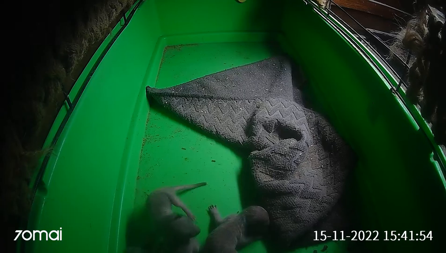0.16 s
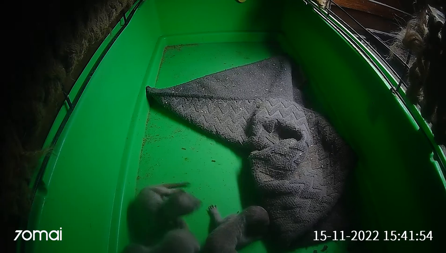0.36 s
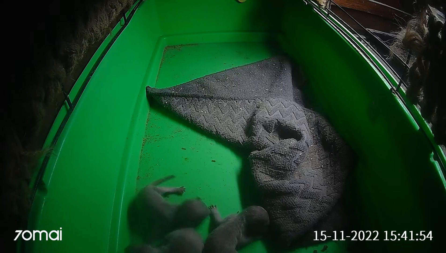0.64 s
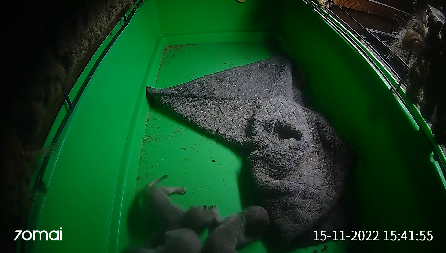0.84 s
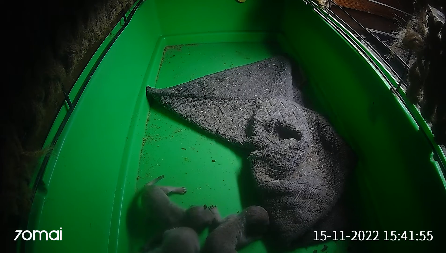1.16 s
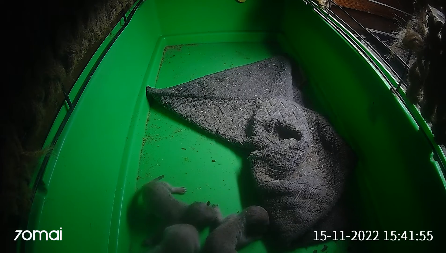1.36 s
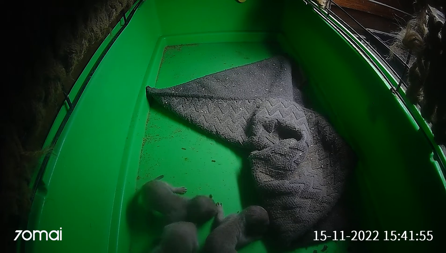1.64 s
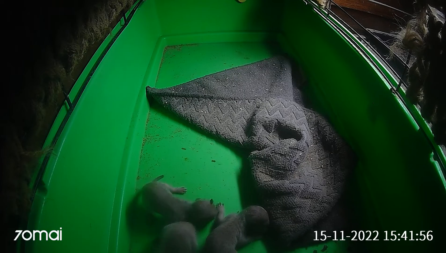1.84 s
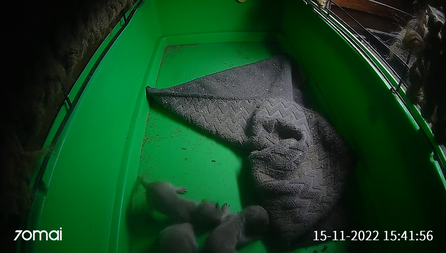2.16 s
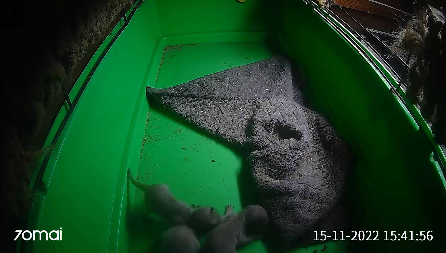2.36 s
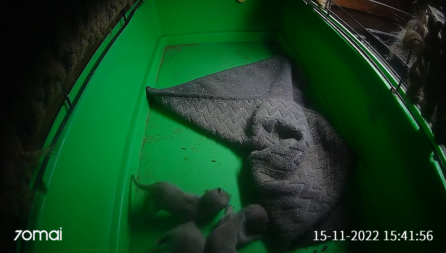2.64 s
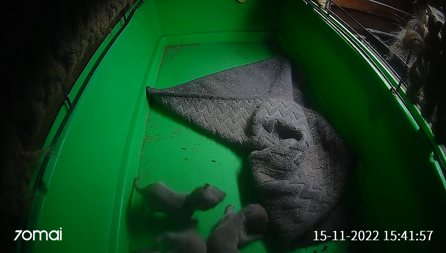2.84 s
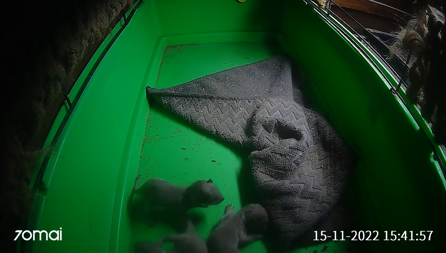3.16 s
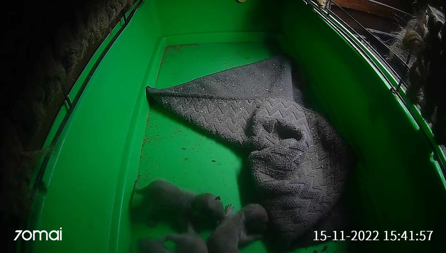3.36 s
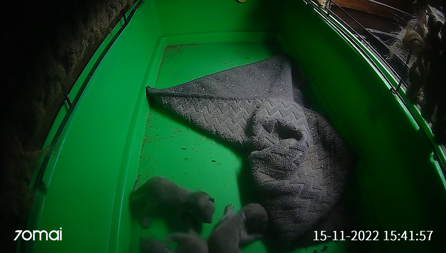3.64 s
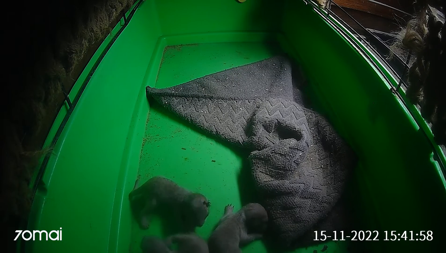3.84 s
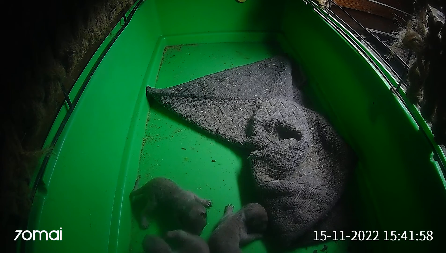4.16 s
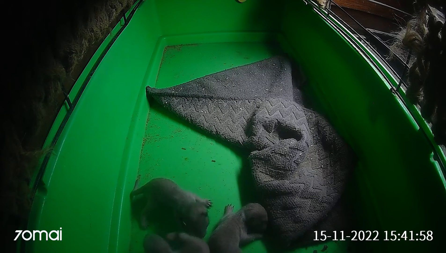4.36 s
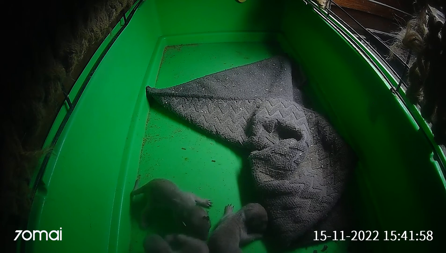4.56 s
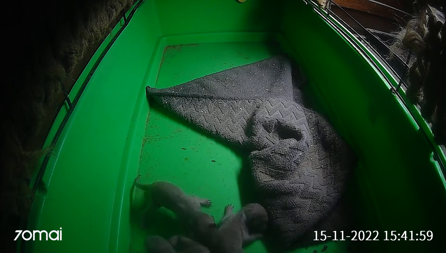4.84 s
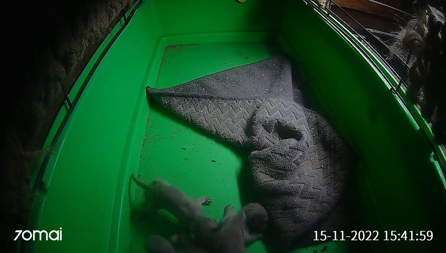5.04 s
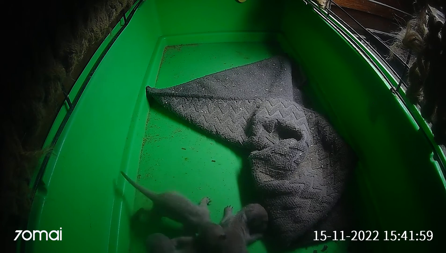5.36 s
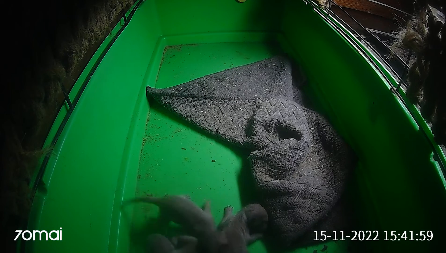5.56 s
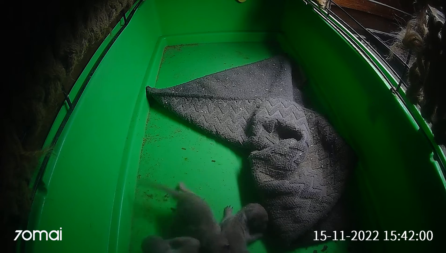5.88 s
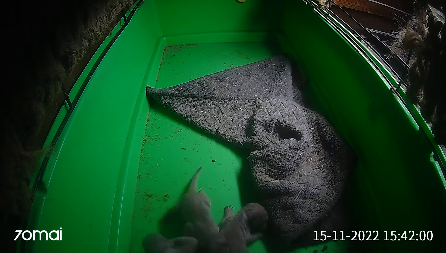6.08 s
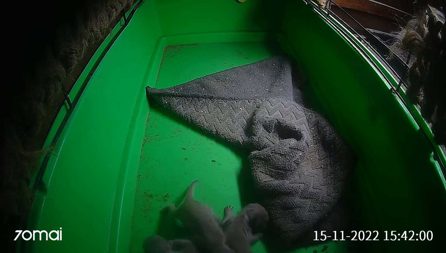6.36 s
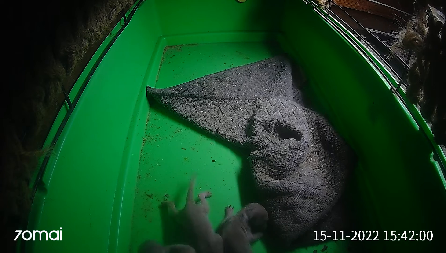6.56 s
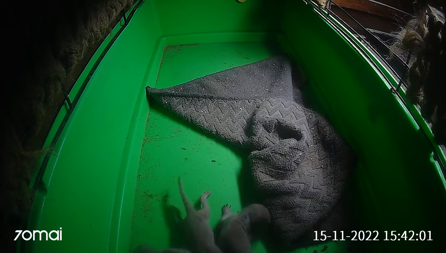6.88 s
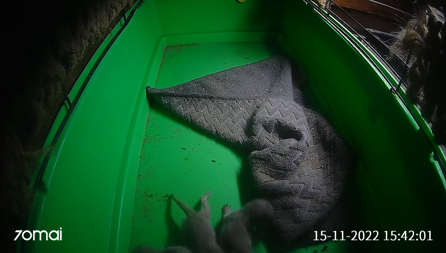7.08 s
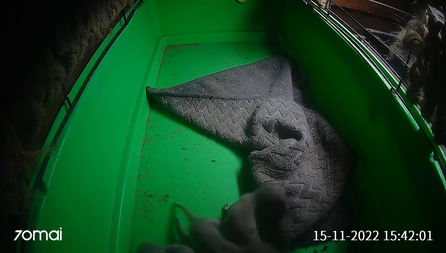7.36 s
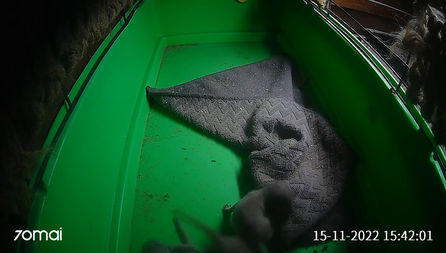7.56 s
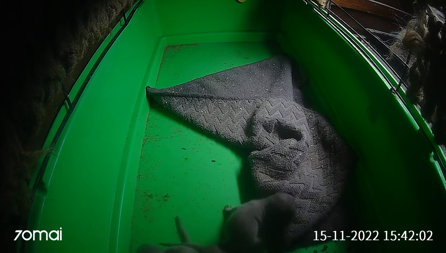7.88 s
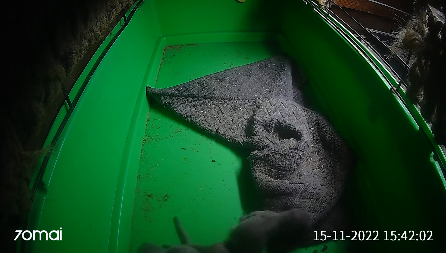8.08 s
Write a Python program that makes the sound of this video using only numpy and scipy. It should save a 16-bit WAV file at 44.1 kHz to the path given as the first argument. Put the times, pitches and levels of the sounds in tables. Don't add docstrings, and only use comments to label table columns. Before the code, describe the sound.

Several newborn pups give short, throaty peeps and quivering trills, separated by brief quiet gaps, in a hard plastic tub. Claws tick and scratch the floor; cloth rustles faintly. A soft low hoot comes midway, then a purring murmur after six seconds, and a cluster of dull thuds near seven and a half. The small close microphone sounds narrow and slightly hissy.

```python
import sys
import numpy as np
from scipy import signal
from scipy.fft import rfft, irfft, next_fast_len
from scipy.io import wavfile
from scipy.ndimage import uniform_filter1d

SR = 44100
rng = np.random.default_rng(int(sys.argv[2]) if len(sys.argv) > 2 else 0)


def level_to_linear(level):
    exponent = np.asarray(level, float) / 20
    return 10 ** exponent


def persist_wave(psi):
    counts = np.round(np.clip(psi, -1, 1) * 32767).astype(np.int16)
    wavfile.write(sys.argv[1], SR, np.atleast_2d(counts).T)


N = 362502
TIME = np.arange(N) / SR
JOIN_S = .009
CLEAR_ROUGH = .044


def rms_one(x):
    return x / np.sqrt(np.mean(x ** 2) + 1e-20)


def passed(x, kind, hz, order=2):
    return signal.sosfilt(signal.butter(order, hz, kind, fs=SR, output="sos"), x)


def noise_below(hz):
    return rms_one(passed(rng.standard_normal(N), "low", hz))


def coloured(x, spectrum):
    hz, level_db = np.transpose(spectrum)
    size = next_fast_len(N)
    grid = np.maximum(np.arange(size // 2 + 1) * SR / size, 1)
    gain = level_to_linear(np.interp(np.log(grid), np.log(hz), level_db))
    return rms_one(irfft(rfft(x, size) * gain, size)[:N])


def ring(hz, t60):
    t = TIME[:SR // 3]
    return np.sin(2 * np.pi * hz * t) * level_to_linear(-60 * t / max(t60, .002))


def grains(per_second, spread_db, largest):
    sizes = level_to_linear(spread_db * np.minimum(rng.exponential(1, N), largest)) * rng.choice([-1, 1], N)
    return sizes * (rng.random(N) < per_second / SR)


def add(out, s, sound):
    i = round(s * SR)
    out[i:i + len(sound)] += sound[:N - i]


def voice(pitch, partials_db, jitter, shimmer, slack_db=0, resonant=0):
    # f/Hz, level/dB
    throat = [(1500, 27.5), (3000, -7.5), (4500, -6.5), (6000, -16.5), (9000, -23.5)]
    phase = 2 * np.pi * np.cumsum(pitch * (1 + jitter)) / SR
    upper_hz = np.mean(pitch) * np.arange(len(partials_db), 14)
    throat_db = np.interp(upper_hz, *np.transpose(throat))
    upper_db = partials_db[-1] - 4.5 + throat_db[1:] - throat_db[0]
    shape_db = np.concatenate([[partials_db[0] - 11.5], partials_db, upper_db])
    slide = (pitch / np.percentile(pitch, 75)) ** resonant
    tone = 0
    for k in range(1, len(shape_db)):
        partial_db = np.interp(k * slide, np.arange(len(shape_db)), shape_db)
        effort_db = slack_db * min(k - 1, 3)
        tone = tone + level_to_linear(partial_db + effort_db) * np.sin(k * phase)
    return tone * (1 + shimmer) * np.sqrt(2 / np.sum(level_to_linear(shape_db[1:]) ** 2))


def microphone_hiss():
    # f/Hz, level/dB per Hz
    hiss_colour = [(12, -50.5), (20, 9.5), (56, 1), (428, -15.5), (626, -13), (729, -24.5), (1440, -23.5),
                   (5390, -28), (7120, -30), (8500, -49), (11000, -92), (18700, -120)]
    return level_to_linear(-57) * coloured(rng.standard_normal(N), hiss_colour)


def creaks():
    return level_to_linear(-67.0) * rms_one(passed(grains(40, 6.2, 4) + 1e-18, "band", [60, 280]))


def shifting():
    # t/s, rustle level/dB, rumble level/dB
    moves = [(0.0, -59.5, -51), (0.2, -63, -67), (0.529, -64.5, -49), (0.78, -68, -45),
             (1.49, -68.5, -50.5), (5.469, -68, -62), (5.841, -59, -40.5), (6.1, -59.5, -47.5),
             (6.62, -61, -46), (7.76, -62.5, -34), (8.22, -63.5, -41.5)]
    # f/Hz, level/dB per Hz
    fur_colour = [(300, 3), (1200, -0.5), (3000, -8), (5000, -10), (8000, -19.5)]
    s, rustle_db, rumble_db = np.transpose(moves)
    clumped = grains(5000, 2.3, 3.5) * level_to_linear(2.5 * noise_below(14))
    rustle = level_to_linear(np.interp(TIME, s, rustle_db) + 3.5) * coloured(clumped, fur_colour)
    rumble = rms_one(passed(rng.standard_normal(N), "band", [25, 130])) * level_to_linear(4.23 * noise_below(6.9))
    return rustle + level_to_linear(np.interp(TIME, s, rumble_db) - 14.5) * rumble


def bumps():
    # t/s, peak level/dB, wall pitch f/Hz, upper knock level/dB re peak
    thuds = [(0.412, -49, 250, -6), (0.717, -34, 97.6, -19), (0.777, -38.5, 72.4, -36),
             (2.636, -51.5, 139.4, 0), (5.743, -66, 63, -28), (5.957, -42.5, 224, -0.5),
             (7.088, -36, 98.3, -33), (7.3, -36.5, 98.2, -12.5), (7.417, -44, 118, -18),
             (7.49, -27, 106, -6), (7.543, -32.5, 124, -20), (7.578, -33, 94.4, -32),
             (7.654, -43, 241.5, 3), (7.678, -37, 59, -23), (7.804, -36, 105, -36),
             (7.9, -38.5, 108.5, -11), (8.02, -39, 59, -37), (8.188, -34, 118, -23)]
    out = np.zeros(N)
    onset = 1 - np.exp(-TIME[:SR // 3] / 0.0018)
    knock = sum(ring(mode_hz, 0.074) for mode_hz in (232.5, 310, 478, 580))
    for s, peak_db, hz, knock_db in thuds:
        add(out, s, level_to_linear(peak_db) * onset * (ring(hz, 0.22) + level_to_linear(knock_db) * knock))
    return out


def claws():
    # t/s, peak level/dB, brightness f/Hz
    ticks = [(0.725, -26.5, 860), (2.235, -37.5, 930), (2.301, -37.5, 1186), (2.389, -36, 1500),
             (2.777, -45, 2000), (4.814, -39.5, 1400), (5.574, -34, 900), (5.953, -36, 676),
             (6.016, -26, 740), (6.949, -35, 1370), (7.296, -49, 915), (7.447, -35.5, 1520),
             (7.523, -28, 593), (7.632, -33, 630), (7.662, -35.5, 635), (7.563, -45, 2400),
             (7.634, -39.5, 2200), (7.66, -41, 3600), (7.903, -34.5, 610)]
    out, t = np.zeros(N), TIME[:SR // 10]
    for s, peak_db, hz in ticks:
        grit = rng.standard_normal(SR // 10)
        attack = np.minimum(t * level_to_linear(peak_db + 38) / .005, 1)
        burst = grit * level_to_linear(-60 * t / .06) * attack
        add(out, s, level_to_linear(peak_db - 3) * passed(burst, "band", [.4 * hz, 2.5 * hz]))
    return out


def purr():
    # t/s, peak level/dB
    swells = [(6.03, -53), (6.057, -50), (6.112, -46.5), (6.153, -44.5), (6.2, -43.5), (6.253, -42),
              (6.308, -42.5), (6.368, -44), (6.425, -44), (6.491, -49.5), (6.558, -49), (6.615, -49),
              (6.649, -51.5), (6.702, -50.5), (6.76, -55.5), (6.794, -52), (6.832, -51.5), (6.897, -51),
              (7.64, -49), (7.69, -77), (7.734, -52), (7.765, -61), (7.814, -54), (7.858, -58.5),
              (7.9, -64), (7.94, -57)]
    # t/s, peak level/dB
    deep_swells = [
        (6.288, -52),
        (6.39, -49),
        (6.655, -50),
        (6.724, -50),
        (6.771, -49.5),
        (6.832, -53),
        (6.923, -49.5),
    ]
    purr_partials = [6, -22, -32, -42]
    wobble, out, t = .035 * noise_below(150), np.zeros(N), TIME[:SR // 10]
    pitched = [(s, 464.3 + 2.5 * max(-45.5 - db, 0), db) for s, db in swells]
    pitched += [(s, 332.6, db) for s, db in deep_swells]
    for s, hz, peak_db in pitched:
        waver = wobble[round(s * SR):][:SR // 10]
        swell = level_to_linear(peak_db) * np.exp(-((t - 1 / 20) / .013) ** 2)
        add(out, s - 1 / 20, swell * voice(hz, purr_partials, waver, 6 * waver))
    return out


def hoots():
    # t/s, pitch f/Hz, level/dB
    hoot_tracks = [
        [(4.23, 555, -70), (4.236, 558, -56), (4.25, 514, -47.5), (4.284, 497, -44.5), (4.318, 513, -50.5),
         (4.336, 514, -42.5), (4.358, 513, -60), (4.372, 472, -53), (4.4, 480, -58)],
        [(4.4, 509, -54), (4.442, 478, -55), (4.456, 488, -46.5), (4.494, 478, -52), (4.516, 514, -59),
         (4.57, 494, -49.5), (4.584, 533, -63), (4.602, 487, -56), (4.62, 491, -67)],
    ]
    out, waver, flutter = np.zeros(N), .025 * noise_below(100), .2 * noise_below(60)
    for rows in hoot_tracks:
        s, hz, level_db = np.transpose(rows)
        at = slice(round(s[0] * SR), round(s[-1] * SR))
        effort_db = np.interp(TIME[at], s, level_db)
        slack_db = 1.7 * np.minimum(effort_db + 45.5, 0) / 2
        pitch = np.interp(TIME[at], s, hz)
        tone = voice(pitch, [1.5, -17, -19, -30], waver[at], flutter[at], slack_db)
        out[at] += level_to_linear(effort_db) * tone
    return out


def snaps():
    # t/s, peak level/dB, ring f/Hz
    pulses = [
        (0.55, -33, 1540),
        (.601, -33, 1560),
        (2.026, -44, 1820),
        (3.749, -42, 1730),
        (3.771, -34, 1650),
        (3.794, -38, 1640),
        (3.85, -36, 1490),
        (3.869, -30, 1480),
        (7.523, -41, 2560),
    ]
    out, onset, t60_s = np.zeros(N), np.minimum(TIME[:SR // 3] / 0.0013, 1), 0.014
    for s, peak_db, hz in pulses:
        overtones = .55 * ring(1.445 * hz, t60_s) + .2 * ring(2.4 * hz, t60_s / 2)
        add(out, s, level_to_linear(peak_db) * onset * (ring(hz, t60_s) + overtones))
    return out


def litter():
    # t/s, length/ms, from f/Hz, to f/Hz, level/dB
    low_glides = [(.248, 13, 680, 707, -35.5), (.517, 22, 726, 739, -35), (2.404, 12, 865, 757, -38),
                  (3.257, 22, 688, 673, -37.5), (3.279, 52, 706.5, 719, -34.5), (3.82, 14, 718, 620, -46),
                  (3.835, 16, 604, 576, -40), (4.627, 33, 681, 716, -35.5), (4.66, 42, 755.6, 771, -33),
                  (5.664, 12, 729, 640, -41.5), (5.762, 17, 596, 618, -38.5), (7.068, 16, 780, 680, -45.5),
                  (7.145, 23, 628, 644, -38), (7.168, 54, 639, 646, -43), (7.222, 29, 667, 744, -49.5),
                  (8.1, 50, 755, 732, -49.5)]
    mid_glides = [(0.423, 33, 924, 899, -35.5), (0.457, 27, 905, 884, -37.5), (0.485, 29, 986, 1130, -49.5),
                  (1.071, 17, 733, 865, -43.5), (1.109, 17, 816, 843, -50), (1.127, 19, 893, 948, -43.5),
                  (1.988, 34, 921, 965, -29), (2.022, 9, 986, 940, -26), (2.03, 19, 864, 910, -36.5),
                  (2.05, 30, 818, 853, -41), (2.079, 30, 899, 797, -44.5), (2.11, 33, 910, 922, -49.5),
                  (3.636, 15, 1036, 889, -38), (3.749, 7.9, 990, 930, -38.5),
                  (3.77, 10.6, 1030, 900, -39.5), (3.794, 8.1, 930, 934, -36.5), (3.867, 23, 885, 960, -46),
                  (4.426, 16, 890, 940, -50), (4.872, 15, 1150, 903, -36), (4.943, 17, 833, 880, -49.5)]
    thin_glides = [(0.987, 17, 1108, 979, -34.5), (1.003, 19, 1043, 1008, -29),
                   (1.023, 25, 1014, 1005, -59), (2.795, 14, 970, 864, -42.5), (2.941, 16, 1016, 1067, -51),
                   (2.956, 12, 1010, 970, -63), (5.136, 27, 1118, 1076, -41.5),
                   (5.162, 17.4, 977, 997, -37.5)]
    high_glides = [(0.149, 40, 1017, 1060, -48), (0.189, 44, 1075, 1004, -53.5),
                   (0.817, 26, 1332, 1135, -58.5), (1.071, 17, 1063, 978, -45),
                   (1.088, 28, 1056, 1062, -43), (1.115, 25, 1097, 1320, -46), (1.141, 13, 1300, 1396, -48),
                   (1.152, 28, 1380, 1290, -48.5), (1.181, 33, 1350, 1225, -56.5),
                   (1.748, 27, 1122, 1190, -51.5), (6.6, 20, 1026, 1073, -39), (6.62, 20, 1071, 1017, -38),
                   (6.974, 24, 1250, 1166, -45), (7.576, 12, 1176, 1025, -51.5), (7.59, 35, 1004, 975, -50),
                   (7.523, 25, 1030, 995, -52), (8.166, 26, 798, 926, -56), (8.192, 26, 942, 1056, -45.5)]
    bright_glides = [(7.484, 5, 1150, 943, -38.5), (7.489, 12, 930, 990, -35.5),
                     (7.501, 16, 945, 960, -37.5), (7.517, 9, 950, 1060, -37.5), (8.094, 9, 962, 892, -40),
                     (8.101, 49, 886, 899, -40), (8.15, 14, 883, 879, -40), (8.162, 12, 798, 803, -43),
                     (8.175, 16, 866, 870, -45), (8.197, 21, 849, 883, -47.5)]
    shrill_glides = [(2.24, 70, 1690, 1620, -65), (5.348, 16, 1557, 1726, -44),
                     (5.366, 22, 1594, 1611, -36), (5.801, 15, 1740, 1410, -39),
                     (5.813, 19, 1455, 1480, -48), (6.144, 12, 1680, 1610, -42.5),
                     (6.158, 8.2, 1540, 1290, -53), (6.38, 21, 1600, 1468, -43),
                     (6.404, 30.4, 1234, 1400, -46)]
    adult_glides = [
        (2.628, 77, 549, 501, -50.5),
        (2.705, 35, 540, 511, -62),
        (2.74, 36, 497, 465, -63.5),
        (3.852, 28.5, 574, 570, -53.5),
    ]
    # t/s, length/ms, from f/Hz, to f/Hz, level/dB
    tails = [
        (.35, 23, 688, 700, -62.5),
        (2.531, 14, 700, 685, -56),
        (3.73, 9.7, 930, 950, -49.5),
        (4.702, 13, 776, 800, -59.5),
        (6.639, 13, 1034, 1074, -53.5),
    ]
    # t/s, length/ms, trough f/Hz, top f/Hz, level/dB
    low_throbs = [(.261, 24, 700, 777, -30), (0.289, 28, 461.5, 780, -28), (0.32, 26, 490, 715, -31.5),
                  (0.538, 19, 742.5, 817, -30.5), (0.559, 24, 548, 789, -30.5),
                  (0.585, 20.8, 502, 780, -30), (0.611, 18.4, 460, 745, -29.5), (0.634, 27, 493, 712, -32),
                  (.664, 30, 501, 659, -34.5), (0.694, 23, 474, 579, -38.5), (2.419, 23.6, 713, 765, -29),
                  (2.443, 16.3, 622, 807, -31.5), (2.463, 18.5, 586, 854, -30), (2.482, 26, 632, 816, -33),
                  (2.508, 20.4, 578, 676, -34), (5.68, 31.2, 664, 711, -35.5), (5.71, 29, 616, 722, -34.5),
                  (5.735, 26, 654, 732, -35), (7.084, 27.3, 660, 717.5, -35.5),
                  (7.118, 26.7, 643.5, 713, -36.5)]
    mid_throbs = [(3.652, 17, 889, 964, -33.5), (3.677, 21, 803, 995, -37), (3.699, 17.8, 804, 954, -37),
                  (3.72, 12.7, 787, 957, -38), (4.325, 17, 895, 975, -35.5), (4.35, 19, 805, 979, -36),
                  (4.378, 15.3, 765, 971, -36), (4.403, 18, 740, 907, -40.5), (4.889, 23, 874, 1013, -34),
                  (4.917, 26, 828, 962, -36)]
    thin_throbs = [
        (2.811, 28.5, 859, 894, -42),
        (2.842, 25.4, 778, 908, -41),
        (2.87, 31.9, 810, 883, -48.5),
        (2.906, 24.5, 886, 980, -48),
    ]
    # swell within a throb (dB), dip at the seams (dB), seam (ms)
    low_trill, mid_trill, thin_trill = (2, 2.75, 6.45), (5.3, 6.3, 7), (3.8, 5.3, 2.4)
    return [((-11.5, -6.5, -10.5, -3), low_trill, low_glides, low_throbs),
            ((-7.5, -17.5, -20.5, -3), mid_trill, mid_glides, mid_throbs),
            ((2, -14, -12, 9.5), thin_trill, thin_glides, thin_throbs),
            ((12, -3.5, -3, 17), low_trill, high_glides, []),
            ((-2, -0.5, -2.5, 7.5), low_trill, bright_glides, []),
            ((6.5, -7, -11.5, -3), low_trill, shrill_glides, []),
            ((14, -4, -31, 22), low_trill, adult_glides, []),
            ((-2.5, -17, -24, 0), low_trill, tails, [])]


def phrases(glides, throbs):
    parts = []
    for trilled, rows in enumerate((glides, throbs)):
        parts += [(s, s + ms / 1000, from_hz, to_hz, db, trilled) for s, ms, from_hz, to_hz, db in rows]
    parts = np.array(sorted(parts))
    return np.split(parts, np.flatnonzero(parts[1:, 0] - parts[:-1, 1] > JOIN_S) + 1)


def mouth(call_s):
    # t/s, fundamental level/dB, upper level/dB, extra seam dip/dB
    mouths = [(8.166, -2, -12, -6), (7.524, 4, -18, 0), (7.577, -5, -6, -11), (1.75, 0, -6, -3),
              (6.382, -1, 1, -3), (2.941, 4, 6, 4), (2.24, -14, 6, 0), (.15, -7.5, -9, -7.5),
              (.248, -4, 7, 3.5), (.422, 4, -7, -6), (.517, -2, 2, 5.5), (.986, -2.5, -8, -7.5),
              (1.07, -9, 1, -12), (1.108, -13, 2, -3), (1.987, 0.5, 7, 5), (2.405, 0, 3, 0.5),
              (2.795, -2, 2, 2), (3.257, 2, -0.5, -8), (3.636, 2, 7, 0.5), (3.82, 6, 3, -2),
              (3.869, 0.5, 4.5, 0), (4.325, 1.5, -5, 2), (4.627, -2.5, -6.5, -4), (4.87, 2, 1.5, 1.5),
              (5.138, -1, -1.5, -6), (5.346, -2.5, -3.5, 13), (5.663, 1.5, -1.5, -1), (6.145, 3, -23, 3.5),
              (6.6, -5.5, -0.5, -14.5), (6.972, -8.5, 3.5, 0), (7.068, 4, 3.5, -2.5)]
    # t/s, third partial level/dB
    hollow = [(1.07, -5), (2.405, -3), (2.795, -3), (3.636, -16), (5.8, 0), (6.6, 4.5), (.248, -8.5),
              (7.068, -2), (.15, 7.5), (1.987, -0.5)]
    shape = next((row[1:] for row in mouths if abs(row[0] - call_s) < .01), (0, 0, 0))
    return *shape, sum(db for s, db in hollow if abs(s - call_s) < JOIN_S)


def roughness(parts, hoarse):
    # t/s, added roughness (0-1)
    raspy = [(.517, .02), (1.07, .04), (2.795, .05), (3.636, .07), (3.869, .2), (4.325, .08), (6.972, .12),
             (7.068, .03)]
    # t/s, added roughness (0-1)
    broken = [(2.24, .12), (1.75, .1), (6.382, .08), (6.405, .12), (8.175, .2), (8.197, .12), (.485, .08),
              (1.069, .2), (1.114, .14), (2.872, .1), (2.906, .2), (3.733, .3), (4.403, .15), (4.428, .2),
              (4.702, .15), (5.815, .12), (7.168, .2), (2.532, .3)]
    start, _, from_hz, top_hz, mean_db, trilled = parts.T
    lost_db = np.clip(mean_db.max() - mean_db - 1.5, 0, 12)
    rough = CLEAR_ROUGH + hoarse * lost_db * (start - start[0] > .065)
    rough += sum(more for s, more in raspy if abs(s - start[0]) < JOIN_S)
    rough += .2 * (max(top_hz.max(), from_hz[0]) < 570)
    if top_hz[-1] > 1.1 * from_hz[-1] and not trilled[-1]:
        rough[-1] = 2 * CLEAR_ROUGH
    rough += sum(more * (abs(s - start) < JOIN_S / 2) for s, more in broken)
    return np.clip(rough, 0, 1)


def fold_pitch(parts, voiced_s, t):
    arch = [(0, 0), (.3, .72), (.5, 1), (.68, 1), (.83, .74)]
    ramp = [(0, 0), (.25, 1 / 3), (.5, 2 / 3), (.75, 1), (.76, 1)]
    start, ends, from_hz, to_hz, _, trilled = parts.T
    when, risen = np.where(trilled[:, None, None], arch, ramp).T
    length = np.where(trilled, ends - start, voiced_s)
    knots_s = np.ravel(start + when * length, "F")
    knots_hz = np.ravel(from_hz + risen * (to_hz - from_hz), "F")
    return uniform_filter1d(np.interp(t, knots_s, knots_hz), size=140, mode="nearest")


def one_call(parts, animal, hoarse, resonant, edge_hz, jitter, shimmer, breath):
    (first_db, third_db, fourth_db, glide_dip_db), (swell_db, trill_dip_db, trill_seam_ms) = animal
    start, ends, from_hz, top_hz, mean_db, trilled = parts.T
    lift_db, bright_db, deeper_db, hollow_db = mouth(start[0])
    end = ends[-1]
    at = slice(round(start[0] * SR), round(end * SR))
    t = TIME[at]

    trilling = np.roll(np.maximum.accumulate(trilled), -1)
    seam_s = np.where(trilling, max(trill_seam_ms + 1.3 * deeper_db, 2), 2.14) / 1000
    dip_db = np.where(trilling, trill_dip_db, glide_dip_db) + deeper_db
    drop = 1 - np.roll(from_hz, -1) / top_hz
    dip_db = dip_db * np.where(trilling, np.clip(drop / .035, .1, 1), 1)
    half = seam_s[:, None] / 2
    after_s = t + .7 * half - np.append(start[1:], 99)[:, None]
    seams = np.exp(-(after_s / half) ** 4) * np.maximum(dip_db, 0)[:, None]

    change_db = np.full(len(start), 1.4)
    change_db[0] = 3
    change_db[-1] = -2.5 if len(start) > 1 else -4.5
    change_db = np.where(trilled, swell_db, change_db)
    voiced_s = np.append(start[1:] - seam_s[:-1], end) - start
    knots_s = np.ravel([start + .27 * voiced_s, start + .78 * voiced_s], "F")
    knots_db = np.ravel([mean_db - change_db / 2, mean_db + change_db / 2], "F")
    level_db = np.interp(t, knots_s, knots_db)

    rasp = roughness(parts, hoarse)[np.searchsorted(start, t + 1e-4) - 1] + seam_s @ seams / .34
    pitch = fold_pitch(parts, voiced_s, t)
    edges = np.clip((t - t[0]) / 0.0035, 0, 1) * np.clip((end - t) / 0.0018, 0, 1)
    slack_db = 0.14 * np.maximum(level_db - level_db.max(), -20)
    partials_db = [first_db + lift_db, 0, third_db + bright_db + hollow_db, fourth_db + bright_db]
    tone = voice(pitch, partials_db, .45 * rasp * jitter[at], .6 * rasp * shimmer[at], slack_db, resonant)
    air = (level_to_linear(-19.5) + 0.14 * rasp) * breath[at]
    throat = passed(passed(tone, "low", edge_hz, order=8) + air, "high", pitch.max() * .6, order=4)
    return at, level_to_linear(level_db - seams.sum(axis=0)) * edges * throat


def calls():
    hoarseness = [.038, .045, .04, .003, .07, .01, .012, 0]
    fixed_mouth = [1, 1, .5, 0, 0, 0, 0, 0]
    # where the voice falls off steeply, f/Hz
    voice_tops = [4800, 5600, 5600, 5700, 6000, 6000, 4000, 4800]
    out = np.zeros(N)
    jitter, shimmer = passed(noise_below(900), "high", SR / 400), noise_below(700)
    breath = rms_one(passed(rng.standard_normal(N), "band", [1200, 6000], order=1))
    for hoarse, resonant, edge_hz, animal in zip(hoarseness, fixed_mouth, voice_tops, litter()):
        timbre, trill, glides, throbs = animal
        for parts in phrases(glides, throbs):
            at, sound = one_call(parts, (timbre, trill), hoarse, resonant, edge_hz,
                                 jitter, shimmer, breath)
            out[at] += sound
    return out


def tub(x):
    echoes = 1. * (np.arange(SR // 8) == SR // 600)
    wall_return = .55
    for ms in (1.3, 2.9, 4.7):
        loop = np.zeros(round(ms * SR / 1000) + 1)
        loop[0], loop[-1] = 1, -wall_return
        echoes = signal.lfilter(loop[::-1], loop, echoes)
    return signal.fftconvolve(x, passed(echoes, "low", 4300))[:N]


def scene():
    near = calls() + purr() + hoots() + claws() + snaps()
    peak_hz, peak_width_hz = 1379, 160
    near = near + 0.7 * signal.lfilter(*signal.iirpeak(peak_hz, peak_hz / peak_width_hz, fs=SR), near)
    return (near + level_to_linear(-13.5) * tub(near) + bumps() + shifting() + creaks() + microphone_hiss())[None]


def top_cut(x):
    return signal.sosfilt(signal.butter(12, 8940, fs=SR, output="sos"), x)


def record(dry):
    cutoff_hz = 8780
    narrow = signal.sosfilt(signal.cheby2(10, 60, cutoff_hz * 1.093, fs=SR, output="sos"), dry)
    return top_cut(narrow)


dry = scene()
out = record(dry)
persist_wave(out)
```